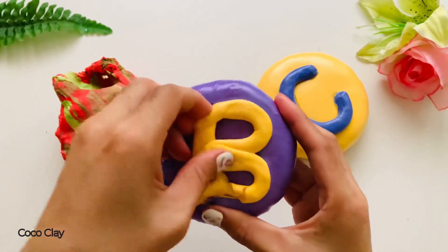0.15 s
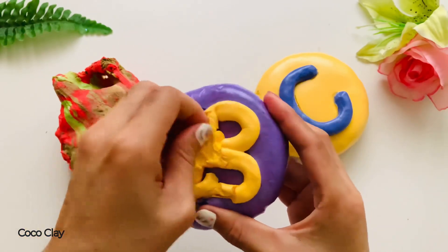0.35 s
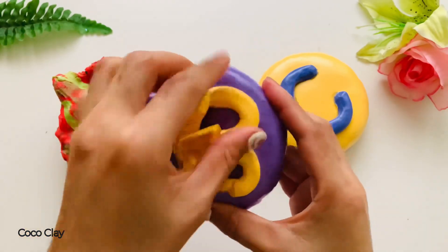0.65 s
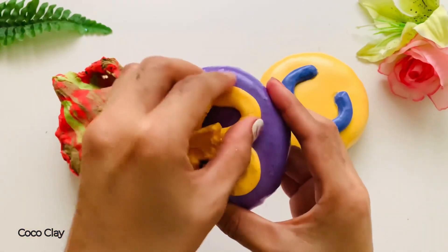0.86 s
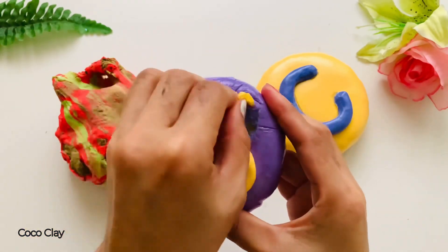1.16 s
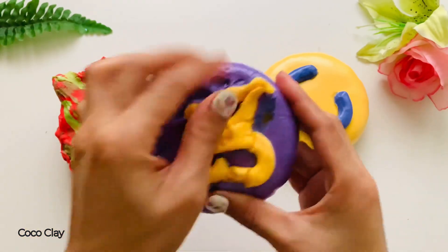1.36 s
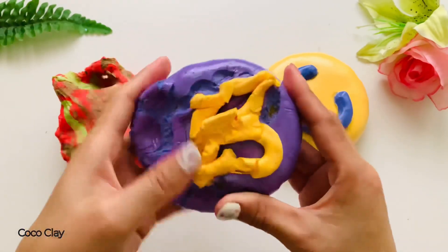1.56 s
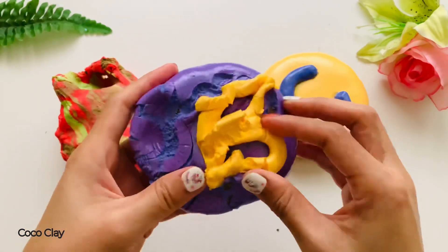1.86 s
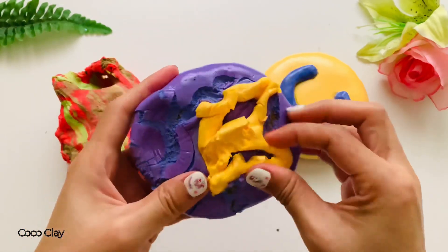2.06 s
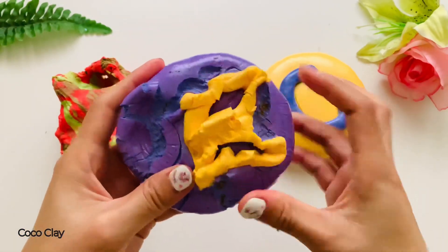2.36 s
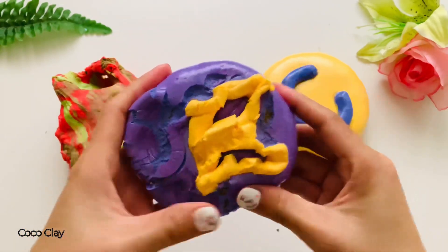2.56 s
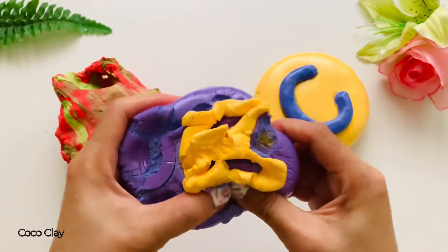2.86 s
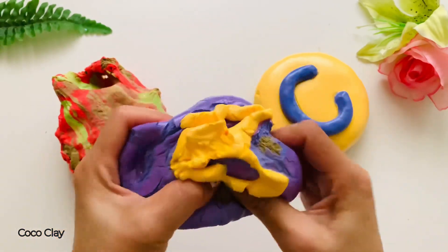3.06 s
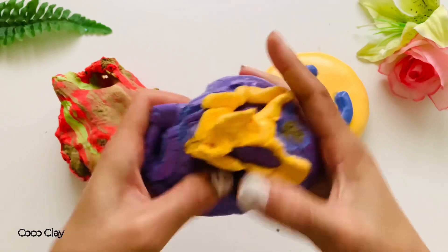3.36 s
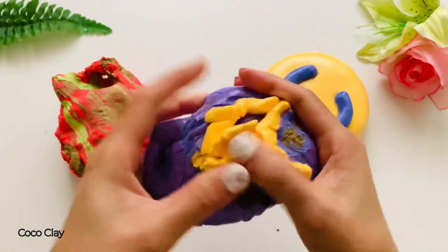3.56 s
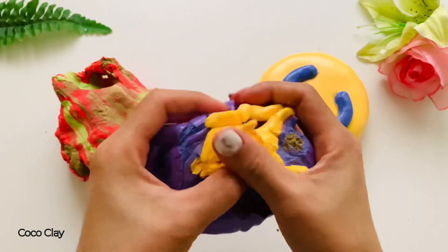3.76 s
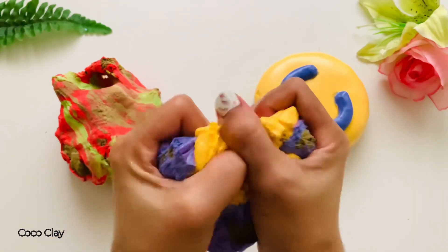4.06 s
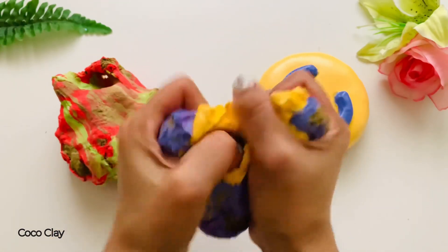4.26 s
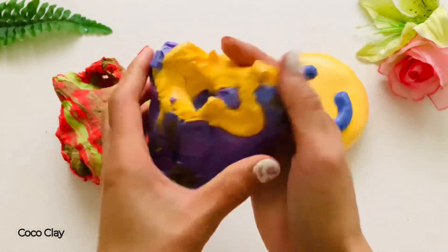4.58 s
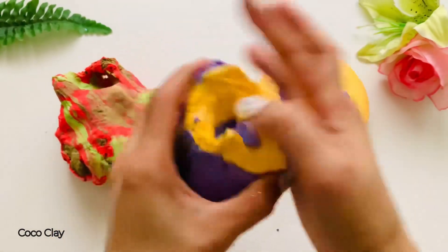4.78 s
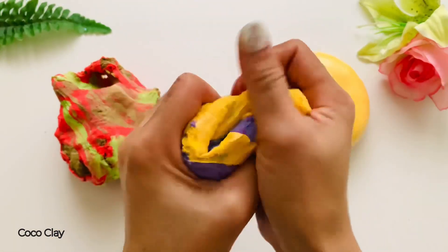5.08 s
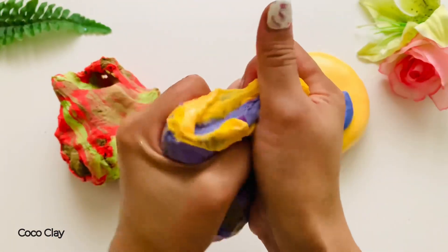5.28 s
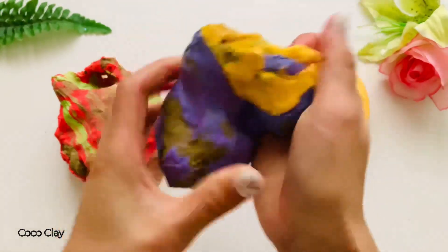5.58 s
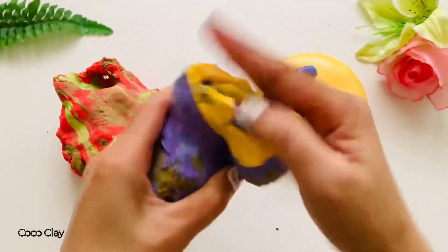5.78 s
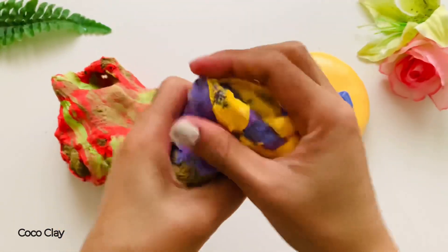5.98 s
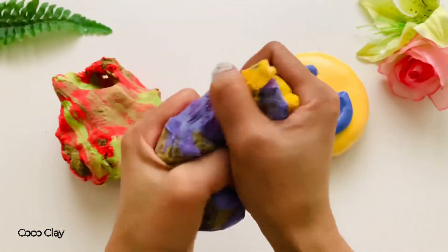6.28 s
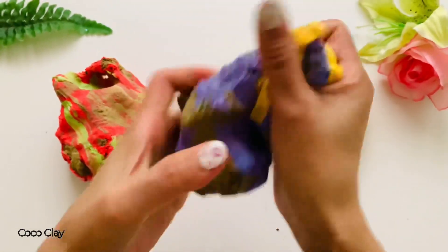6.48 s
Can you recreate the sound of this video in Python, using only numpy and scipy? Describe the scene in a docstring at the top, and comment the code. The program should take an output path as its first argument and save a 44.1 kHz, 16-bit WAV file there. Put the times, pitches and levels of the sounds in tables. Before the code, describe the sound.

Hands crush a skinned cake of soft clay up close: sharp dry cracks, gritty crunching and dull thuds, with lulls, then dense crackling.

```python
"""Hands crush a cake of soft clay under a dried, brittle skin, close to a microphone on a table.
First comes a quick run of cracks, then sparser ones, with a lull before 0.9 s and more gaps until about 2.6 s.
Cracking crowds together around 4 s, has its strongest snap near 4.65 s, then crackles on to the end.
Cracks are ringing flakes plus noise; a crunch of small fractures, dull thuds and pops fill in between.
All along, a bare room answers with noise echoes and filtered noise makes the building rumble far below."""
import sys
import numpy as np
from scipy import signal
from scipy.fft import rfft, irfft, next_fast_len
from scipy.io import wavfile
from scipy.ndimage import map_coordinates

SR = 44100
rng = np.random.default_rng(int(sys.argv[2]) if len(sys.argv) > 2 else 0)


def generate_wav(signal):
    """Clip the signal to [-1, 1] and save it as 16-bit WAV at the path in sys.argv[1]."""
    frames = np.transpose(np.atleast_2d(signal))
    scaled = np.clip(frames, -1, 1) * 32767
    pcm = np.round(scaled).astype(np.int16)
    wavfile.write(sys.argv[1], SR, pcm)


N = 292383

# building noise, shape only: [f/Hz, relative level/dB]
RUMBLE_SHAPE = [(2, -58), (6, -5), (14, 5.5), (24, -11.5), (36, -21), (46, -11), (62, -31.5), (70, -13),
                (78, -24), (96, -30.5), (115, -36.5), (300, -39), (600, -50.5), (1600, -54), (12000, -72)]
# how long the room rings, down to -60 dB: [f/Hz, t/s]
ROOM_DECAY = [(300, 1), (1500, 1), (6000, 0.49), (14000, 0.41)]
# presses of the fingers: [hardest moment t/s, build-up t/s, dying away t/s,
#                          crunch level/dB, treble level/dB, thud level/dB]
PRESSES = [(0, .1, 0.25, -42, 5, -63), (0.259, 0.082, 0.1, -23, 3.5, -48),
           (0.476, 0.054, 0.14, -28, 2, -47.5), (0.948, 0.011, 0.012, -58.5, -16, -40),
           (1.03, 0.08, 0.55, -39, 5.5, -80), (1.332, 0.037, 0.058, -29.5, -3.5, -53),
           (1.368, 0.013, 0.024, -28, 1, -36.5), (1.779, 0.023, 0.041, -45, -10.5, -46.5),
           (2.19, 0.19, 0.6, -40, 9, -59), (2.324, 0.034, 0.038, -33.5, 0, -41),
           (2.491, 0.024, 0.014, -40, -20, -65), (2.89, 0.19, 1, -41, 5, -61.5),
           (3.2, 0.39, 0.16, -37.5, -7.5, -46.5), (3.401, 0.09, 0.069, -32, -14.5, -41),
           (3.59, 0.11, 0.055, -45.5, -8, -57), (3.74, 0.014, 0.029, -60, 2, -42),
           (3.91, 0.16, 0.71, -28, 3, -42.5), (4.31, 0.056, 0.18, -23, -9.5, -36),
           (4.65, 0.14, 0.44, -34, -14, -48), (5.01, 0.15, 0.31, -28.5, 2.5, -64),
           (5.26, 0.17, 0.053, -31.5, -2.5, -75), (5.439, 0.064, 0.064, -21, -8, -31.5),
           (5.6, 0.27, 0.39, -52.5, -16, -75), (5.731, 0.033, 0.041, -37, -6, -42.5),
           (5.799, 0.051, 0.029, -32.5, -7.5, -56), (5.97, 0.079, 0.13, -37, 3, -48.5),
           (6.17, 0.15, .2, -36, 0.5, -50), (6.291, 0.17, 0.15, -34.5, 1, -56),
           (6.411, 0.01, 0.22, -29, 2.5, -44), (6.529, 0.11, 0.009, -26.5, -6.5, -49.5),
           (6.63, 0.057, 0.082, -34, -3, -66)]
# tone of the soft core under the fingers: [f/Hz, level/dB]
SOFT_CORE = [(25, 5), (48, 15.5), (350, 3), (900, 2.5), (3000, -66)]
# air pockets in the clay popping shut: [t/s, level/dB before fading, f/Hz]
AIR_POPS = [(0.208, -18.5, 566), (1.329, -25, 307), (4.333, -18, 378), (5.981, -32, 328), (6.117, -23, 324),
            (6.456, -20, 354)]
# how well a small piece sends out each pitch: [f/Hz, level/dB]
SMALL_PIECE = [(150, -4.5), (700, -4), (1500, -2), (4500, 9.5), (12000, 2), (15500, -7.5)]
# ringing modes of the hollow cake: [middle f/Hz, relative level/dB, time to fall 60 dB t/s]
HOLLOW_CAKE = [(1563, -3.5, 0.0063), (2200, -10.5, 0.013), (3050, -15.5, 0.012), (5000, -8, 0.0025)]
# single cracks of the skin: [t/s, peak level/dB before the small-piece tone,
#                             ring of the flake f/Hz, treble level/dB]
SKIN_CRACKS = [(0.024, -24.5, 7600, 3), (0.0748, -22.5, 6700, 12), (0.134, -20.5, 11460, 8),
               (0.1556, -11.5, 3200, 4), (0.1726, -14, 7190, 0), (0.183, -6, 3200, 5.5),
               (0.2112, -1.5, 3180, 4.5), (0.213, -4, 5000, -18), (0.2306, -10, 8700, -10),
               (0.247, -4, 6300, 9), (0.2581, 1.5, 6400, 23), (0.276, -16.5, 5900, -7.5),
               (0.2838, -13, 5330, -18.5), (0.295, -9.5, 5860, 7.5), (0.358, -9, 6800, 9.5),
               (0.4609, -11.5, 2160, -15), (0.4857, -7.5, 4650, 9), (0.502, -7.5, 5500, -7),
               (0.865, -31, 6000, 10), (0.8912, -30.5, 2430, -1), (0.9378, -26.5, 1460, 0),
               (0.9495, 3.5, 1490, -28), (1.0287, -11, 12450, -8), (1.0432, -5, 3020, 0.5),
               (1.091, -5, 2000, -23), (1.099, -21, 8800, 17), (1.108, -10, 7400, -17),
               (1.1167, -5.5, 7150, 22), (1.1317, -6.5, 4900, 7), (1.1702, -12.5, 11930, 10),
               (1.195, -12.5, 3380, 8.5), (1.3352, -10, 5900, -23), (1.407, -30, 6050, 0),
               (1.6059, -24.5, 10590, -5), (1.7619, -25.5, 1850, -21), (1.9868, -13.5, 5530, 0),
               (2.0477, -8, 5400, 12.5), (2.075, -18.5, 2400, -21), (2.1176, -13, 2600, 7),
               (2.1324, -14.5, 6000, 4), (2.2038, -8, 4480, 5), (2.495, -37, 1560, -22),
               (2.6598, -5, 6140, 2), (2.7411, -9.5, 7100, 11), (2.8395, -28.5, 2930, 8),
               (2.8543, 2.5, 9800, 4), (2.8874, -9, 4170, 10), (2.897, -21, 7750, 14),
               (2.914, -4, 5160, 9.5), (2.938, -22, 5260, 1), (2.96, -7, 3080, 8), (2.9801, -20, 6600, -8),
               (3.0008, -3.5, 2660, 1), (3.0591, -4.5, 6900, 8), (3.1049, -13.5, 5400, -13),
               (3.1132, -5.5, 8500, 7), (3.2013, -13, 4040, -21), (3.2207, -16.5, 1680, -22),
               (3.3534, -20, 3340, 0), (3.3837, -15, 1660, -23), (3.4032, -10, 3620, -30),
               (3.4621, -12.5, 8960, -18), (3.58, -15, 1570, -11), (3.7386, 3, 2150, 1),
               (3.7685, -19, 6700, 8), (3.786, -6.5, 3850, 8), (3.8038, -9, 2930, -15),
               (3.8243, 2, 6600, -0.5), (3.868, 1.5, 4900, 6), (3.889, -0.5, 3960, 12),
               (3.913, -3, 5930, -8), (3.916, -1, 3940, 15), (3.9223, -8.5, 3300, 5),
               (3.9334, 3.5, 6200, -2), (3.949, -12, 3480, 1), (3.9655, -3, 2360, -22),
               (3.9747, -2.5, 9090, 6), (3.984, -8.5, 4870, -14), (4.005, -7.5, 8530, 16),
               (4.0344, -4, 6340, 1), (4.0454, -6, 4770, -5), (4.058, -8, 10210, 24),
               (4.0763, -1.5, 6300, 15), (4.0932, -12, 4650, 14), (4.105, -0.5, 8160, 11),
               (4.111, -8, 10600, 8), (4.124, -4, 9470, 7), (4.1728, 3.5, 6840, 18.5),
               (4.2202, -4, 10700, 6), (4.2933, 4.5, 4300, -20), (4.3081, -0.5, 2740, -22),
               (4.4159, -11.5, 4320, 11), (4.5711, -19, 2460, -4), (4.5907, -14.5, 4000, 7),
               (4.6167, 4.5, 4000, -1.5), (4.652, 9, 1570, -36), (4.751, -13, 2100, 4),
               (4.862, -15, 2680, -27), (4.92, -15, 2440, -8), (4.9467, -8, 2860, -1),
               (4.962, -19, 3250, -12), (4.9653, -7.5, 3160, -8), (4.9955, -0.5, 2980, 2.5),
               (5.009, -11, 3100, -6), (5.0226, -2.5, 3050, 14), (5.1093, -12, 7900, 10),
               (5.1123, -21, 12200, 11), (5.1192, -9.5, 5900, 12), (5.1341, -9.5, 4300, 0),
               (5.1807, -8.5, 7800, 32), (5.2103, -15.5, 2650, -2), (5.224, -15, 4860, -16),
               (5.267, -15.5, 4780, -1), (5.3735, -17, 4010, 8), (5.4065, -7, 2020, 2),
               (5.413, -2.5, 2670, -14), (5.436, -1, 3500, 2), (5.4432, -8, 4360, 9),
               (5.5909, -19.5, 8000, -4), (5.6352, -10, 5960, 0), (5.6401, -16, 2980, 10),
               (5.6998, -12.5, 2060, -30), (5.7168, -13, 6270, 7), (5.7303, -11.5, 1850, -10),
               (5.8798, -19.5, 3380, 5), (5.926, -24, 3000, -7), (5.9429, -18, 3450, -2),
               (5.9594, -14, 2200, -6), (6.008, -21, 3250, -3), (6.0368, -13.5, 12020, 20),
               (6.081, -10.5, 1650, -26), (6.091, -13.5, 11370, 25), (6.129, -13.5, 10400, 16),
               (6.1385, -11, 8570, 12), (6.1476, -7.5, 8550, 30), (6.1808, -10.5, 8260, 6),
               (6.2022, -10.5, 7500, -1), (6.2653, -17, 3920, -13), (6.277, -21, 3790, 5),
               (6.3, -11.5, 3010, 11), (6.3982, -15, 4320, 11), (6.4469, -7.5, 6000, 0),
               (6.4577, -6, 3250, 5), (6.5074, -15, 4400, -1), (6.531, -11, 5700, -15)]

TOP_HZ = 16100  # band limit
SWING_DB = 20  # what a press gains over its build-up and loses over its dying away
BUILD_POWER, THUD_SWINGS = 1.64, 0.95  # curve of the build-up; factor on the swing for thuds


def amp(db):
    """Turn decibels into a gain."""
    return 10 ** (np.asarray(db) / 20)


def along(points, hz):
    """Read between (f/Hz, value) points on a log pitch axis."""
    f, v = np.transpose(points)
    return np.interp(np.log(hz + 1), np.log(f + 1), v)


def filtered(x, response):
    """Multiply each frequency of x by a gain."""
    m = next_fast_len(N + SR // 2)
    gain = response(np.fft.rfftfreq(m, 1 / SR))
    return irfft(rfft(x, m) * gain, m)[:N]


def causal(points, size=1024):
    """Make a filter with the given tone that answers as early as possible (minimum phase)."""
    log_gain = np.log(amp(along(points, np.fft.rfftfreq(size, 1 / SR))))
    cepstrum = irfft(log_gain, size)
    # fold the half before time zero onto the half after it
    cepstrum[1:size // 2] *= 2
    cepstrum[size // 2 + 1:] = 0
    return irfft(np.exp(rfft(cepstrum)), size)


def rumble():
    """Low building noise over a faint hiss: random noise shaped by frequency."""
    x = filtered(rng.standard_normal(N), lambda hz: amp(along(RUMBLE_SHAPE, hz)))
    return amp(-31) * x / x.std()


def room(x, early_db, late_db, count=6):
    """A quick answer from table and hands, then a tail in which each frequency dies at its own speed."""
    hz, t, noise = signal.stft(rng.standard_normal((count, SR)), SR, nperseg=256)
    late = amp(late_db - 60 * t / along(ROOM_DECAY, hz)[:, None])
    early = amp(early_db - 60 * t / 0.026)
    echoes = signal.istft(noise * (late + early), SR, nperseg=256)[1]
    # the hands move, so successive moments meet different echoes
    turn = np.arange(N) // 2000 % count == np.arange(count)[:, None]
    answer = signal.fftconvolve(x * turn, echoes, axes=1).sum(0)
    # the answer starts 110 samples late
    return np.pad(answer, (110, 0))[:N]


def kneading(s):
    """Crunch, treble and thud in dB at times s: presses swell, die away and add up in power."""
    columns = np.transpose(PRESSES)[:, :, None]
    peak_s, build_s, dying_s, crunch_db, treble_db, thud_db = columns
    early = np.maximum(peak_s - s, 0) / np.abs(build_s)
    late = np.maximum(s - peak_s, 0) / np.abs(dying_s)
    shape_db = -SWING_DB * (early ** BUILD_POWER + late)
    # the tiny floor keeps the logarithm safe
    crunch_power = amp(crunch_db + shape_db) ** 2 + 1e-20
    thud_power = amp(thud_db + THUD_SWINGS * shape_db) ** 2 + 1e-20
    total = crunch_power.sum(0)
    # the louder a press, the more its treble counts
    treble = (crunch_power * treble_db).sum(0) / total
    return 10 * np.log10(total), treble, 10 * np.log10(thud_power.sum(0))


def thuds(count=2500, size=64):
    """The soft core gives way in dull pushes: random clicks through a low-pitched filter."""
    s = np.arange(0, N, size) / SR
    pushes = np.zeros(N)
    pushes[rng.integers(0, N, count)] = rng.laplace(size=count)
    x = signal.fftconvolve(pushes, causal(SOFT_CORE, size=4096))[:N]
    level_db = np.interp(np.arange(N) / SR, s, kneading(s)[2])
    return amp(level_db) * x / x.std()


def pops():
    """Each closing air pocket gives a few dull cycles with a soft start."""
    x, t = np.zeros(N + SR), np.arange(SR // 10) / SR
    for s, db, hz in AIR_POPS:
        fade = amp(db - 60 * t / 0.02)
        soft_start = 1 - np.exp(-t / 0.0018)
        x[round(s * SR):][:len(t)] += fade * soft_start * np.sin(2 * np.pi * hz * t)
    return x[:N]


def fractures(s, db, hz, treble_db, cycles, tear_s, rise_s, body_db, size=360):
    """Each fracture: a ringing flake, a bright tearing burst and a knock in the hollow cake.
    Second row: what the room receives, where the tearing averages out over all directions."""
    t = np.arange(size) / SR
    chance = rng.standard_normal((len(s), size + 1 + 2 * len(HOLLOW_CAKE)))
    # the flake's ring falls 60 dB in the given number of cycles
    ring_fade = amp(-60 * t * hz[:, None] / cycles)
    wave = -np.cos(2 * np.pi * hz[:, None] * t) * ring_fade
    # differences of random numbers make a bright noise
    bright_noise = np.diff(chance[:, :size + 1]) / 2
    tear = amp(treble_db[:, None] - 60 * t / tear_s) * bright_noise
    # the break itself is one abrupt step back and forth
    wave[:, 1:3] += [-1.6, 1.6]
    for k, (mode_hz, mode_db, t60) in enumerate(HOLLOW_CAKE):
        bend, strength = chance[:, -1 - 2 * k, None], chance[:, -2 - 2 * k, None]
        # the cake changes shape, so its modes drift from blow to blow
        drifted_hz = mode_hz * np.exp(0.12 * bend)
        knock = amp(body_db + mode_db + 2.16 * strength - 60 * t / t60)
        wave = wave + knock * np.sin(2 * np.pi * drifted_hz * t)
    spread = wave.copy()
    # for the room, a short step stands in for the tearing
    tear_size = np.linalg.norm(tear, axis=1, keepdims=True)
    spread[:, 1:3] += tear_size * np.array([-1, 1]) / 2.6
    wave = (wave + tear) * (1 - np.exp(-(t + 1 / SR) / rise_s))
    # both rows share the gain that sets the close sound's peak
    gain = amp(db[:, None]) / np.abs(wave).max(axis=1, keepdims=True)
    at = np.round(s * SR).astype(int)[:, None] + np.arange(size)
    rows = [np.bincount(at.ravel(), (gain * w).ravel(), N + size + 1)[:N] for w in (wave, spread)]
    return np.array(rows)


def crunch(count=3000):
    """Small fractures of very unequal size, coming in clumps, as loud as the kneading is hard."""
    s = np.sort(rng.random(count)) * N / SR
    # a smooth random curve, 70 points a second
    clump = map_coordinates(rng.standard_normal(600), [s * 70])
    level_db, treble, _ = kneading(s)
    unequal = np.minimum(rng.exponential(size=count), 2.8)
    db = level_db + 1.38 * clump + 4.56 * unequal
    # brighter kneading breaks smaller flakes, which ring higher
    hz = 4500 * np.exp(0.075 * treble + .5 * rng.standard_normal(count))
    hz = np.clip(hz, 900, 14000)
    # most breaks are over at once, a few tear on
    life_s = 0.0042 * np.exp(0.67 * rng.standard_normal((count, 1)))
    treble_db = treble + 6 * rng.standard_normal(count)
    return fractures(s, db, hz, treble_db, cycles=9.7, tear_s=life_s, rise_s=.0001, body_db=-1.0)


def snaps():
    """The single cracks: each breaking flake of skin rings at its own pitch."""
    s, db, hz, treble_db = np.transpose(SKIN_CRACKS)
    return fractures(s, db, hz, treble_db, cycles=7.1, tear_s=0.0038, rise_s=.00004, body_db=-5)


def scene():
    """Clay near, room around it, rumble below."""
    breaking = snaps() + crunch()
    breaking = signal.fftconvolve(breaking, causal(SMALL_PIECE)[None], axes=1)[:, :N]
    clay, spread = breaking + thuds() + pops()
    return (clay + room(spread, early_db=-40.5, late_db=-48) + rumble())[None]


def record(dry):
    """Round off the loudest cracks toward 0.85 of full scale, then remove the sound above the band limit."""
    x = dry[0] / (1 + np.abs(dry[0] / .85) ** 6) ** (1 / 6)
    # a steep slope at the limit, and nothing from 16700 Hz up
    return filtered(x, lambda hz: 1 / (1 + (hz / TOP_HZ) ** 70) * (hz < 16700))[None]


dry = scene()
out = record(dry)
generate_wav(out)
```